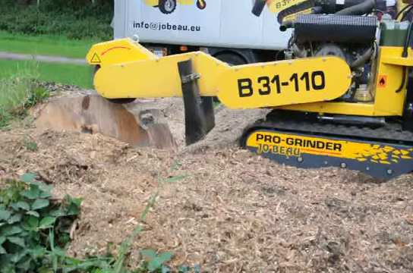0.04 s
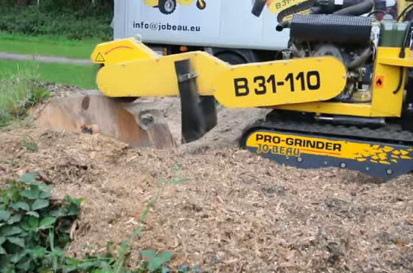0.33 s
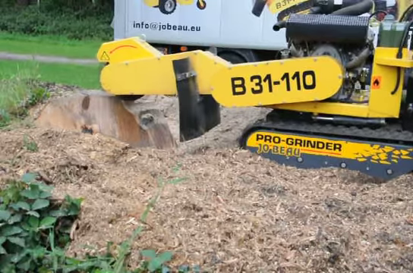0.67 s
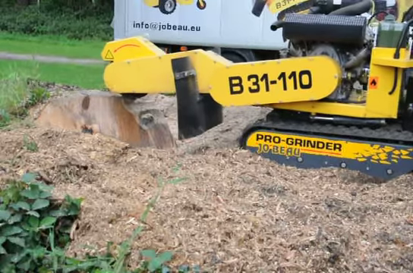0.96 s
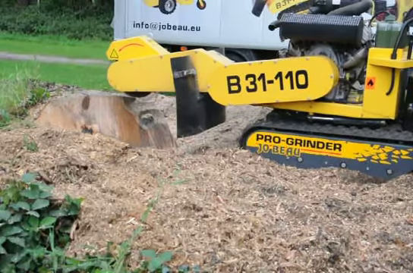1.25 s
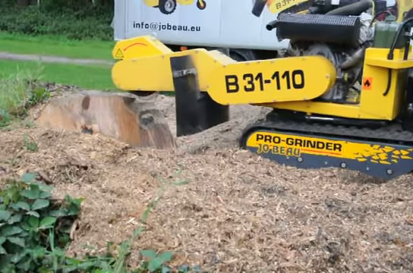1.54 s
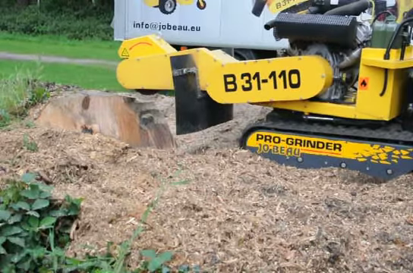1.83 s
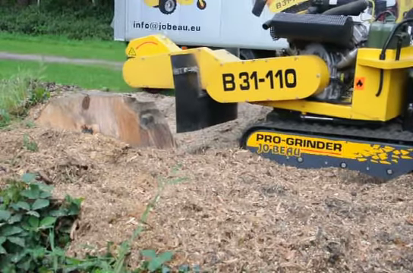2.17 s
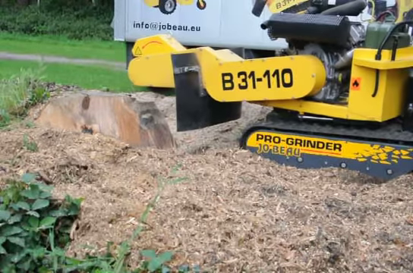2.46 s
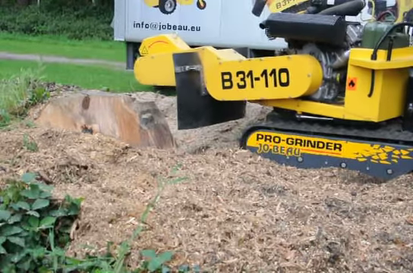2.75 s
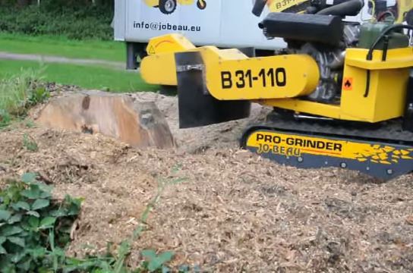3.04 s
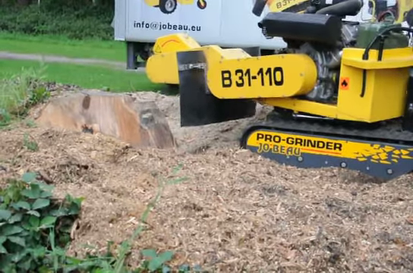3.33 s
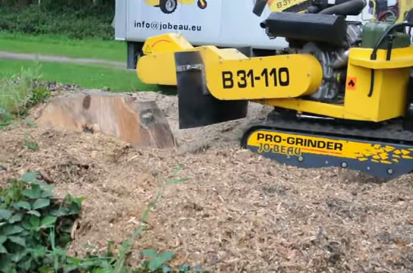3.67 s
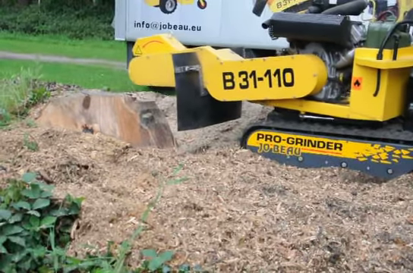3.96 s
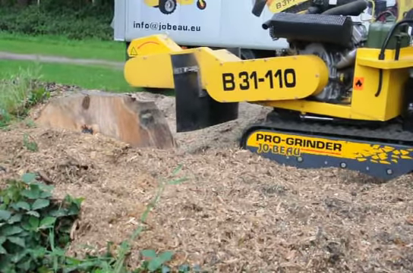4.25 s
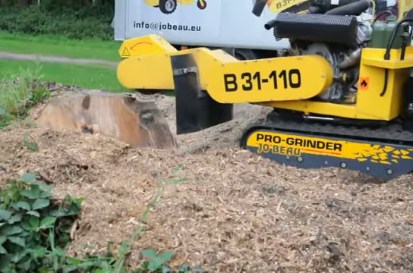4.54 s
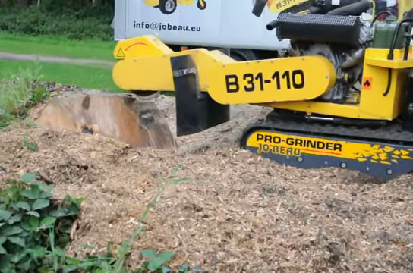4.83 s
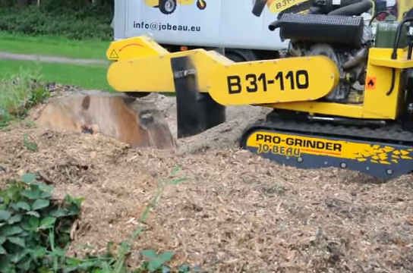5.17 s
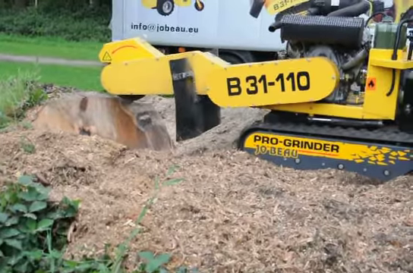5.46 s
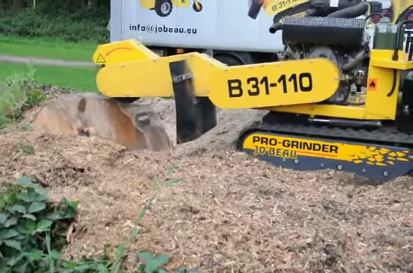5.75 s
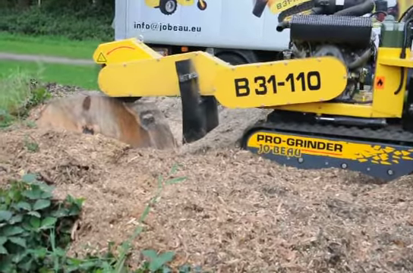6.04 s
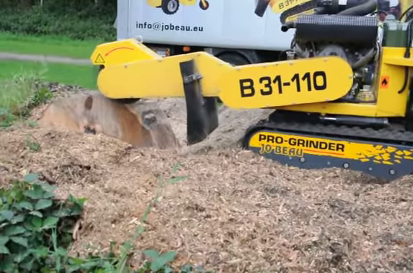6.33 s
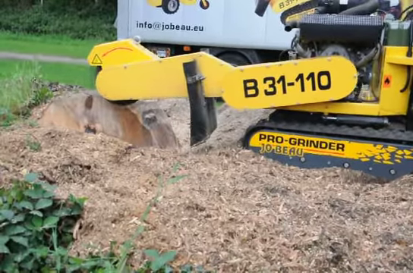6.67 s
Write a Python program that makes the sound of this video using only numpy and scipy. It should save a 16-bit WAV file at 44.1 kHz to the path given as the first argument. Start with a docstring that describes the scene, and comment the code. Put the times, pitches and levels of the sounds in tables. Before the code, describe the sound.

Outdoors, the loud drone of a stump grinder fades in and holds at full speed. Rapid muffled exhaust pulses mix with a clattering engine casing, whining drive parts and sharp metallic ticks. A gritty rush from the fan and cutter wheel swells a little and settles. One thin click interrupts briefly, then the valve rattle grows stronger toward the finish.

```python
"""A stump grinder fades in outdoors, already at full throttle. Its V-twin fires in uneven pairs through
a muffler, the casing knocks, valves tick, shaft-driven parts whine, fan and cutter wheel add a gritty rush.
The rush lifts a little as the boom swings out over the stump, then eases as it swings back.
At about five seconds the sound skips once with a thin click; near the end a loose valve rattles harder."""
import sys
import numpy as np
from scipy import signal
from scipy.fft import rfft, irfft, next_fast_len
from scipy.io import wavfile
from scipy.ndimage import map_coordinates

SR = 44100
rng = np.random.default_rng(int(sys.argv[2]) if len(sys.argv) > 2 else 0)


def generate_wav(signal):
    """Clip the signal to [-1, 1] and save it as 16-bit WAV at the path in sys.argv[1]."""
    frames = np.transpose(np.atleast_2d(signal))
    scaled = np.clip(frames, -1, 1) * 32767
    pcm = np.round(scaled).astype(np.int16)
    wavfile.write(sys.argv[1], SR, pcm)


N = 295470
SKIP_S = 5.075

# the two cylinders firing: place/cycle, level/dB
CYLINDER_BEATS = [(.595, 0), (.97, -.5)]
# valve strokes, the loose valve much the louder: place/cycle, level/dB
VALVE_BEATS = [(.42, 0), (.04, -9)]


def amp(db):
    return 10 ** (np.asarray(db) / 20)


def unit(x):
    """Normalise to an RMS of one."""
    return x / np.sqrt(np.mean(x ** 2) + 1e-20)


def eq_gain(points, hz):
    """Gain of an EQ curve drawn through (f/Hz, level/dB) points on a log frequency axis."""
    f, db = np.transpose(points)
    return amp(np.interp(np.log(hz + 1), np.log(f + 1), db))


def automation(points):
    """One value per sample, ramping between (t/s, value) points."""
    return np.interp(np.arange(N) / SR, *np.transpose(points))


def wobble(rate):
    """A smooth random curve, rate knots a second."""
    coarse = np.arange(0, N + 64, 64)
    knots = rng.standard_normal(int(N * rate / SR) + 4)
    return np.interp(np.arange(N), coarse, map_coordinates(knots, [coarse * rate / SR]))


def filtered(x, response):
    """Filter x by a complex response, given as a function of frequency."""
    size = next_fast_len(N + SR // 2)
    return irfft(rfft(x, size) * response(np.fft.rfftfreq(size, 1 / SR)), size)[:N]


def ring_through(x, points, size=16384):
    """Minimum-phase EQ: the ring follows each hit."""
    cepstrum = irfft(np.log(eq_gain(points, np.fft.rfftfreq(size, 1 / SR))))
    cepstrum[1:size // 2] *= 2
    cepstrum[size // 2 + 1:] = 0
    impulse_response = irfft(np.exp(rfft(cepstrum)))
    return signal.fftconvolve(x, impulse_response)[:N]


def strokes(cycle, place, scatter_db, jitter_s):
    """One impulse per engine cycle at the given place, uneven in strength and timing."""
    at = np.flatnonzero(np.diff(np.floor(cycle - place)) > 0)
    chance = rng.standard_normal((len(at), 2))
    at = np.clip(at + jitter_s * SR * chance[:, 0], 0, N).astype(int)
    return np.bincount(at, amp(scatter_db * chance[:, 1]), N + 1)[:N]


def surge(cycle, beats, lag, decay):
    """A sharp-attack envelope for each beat; lag and decay are in cycles."""
    return unit(sum(amp(db) * np.exp(-((cycle - place - lag) % 1) / decay) for place, db in beats))


def crank():
    """Four-stroke cycles turned so far: the governor hunts gently, and the beat slips back at the skip."""
    cycle_hz, slip_cycles = 27.54, .353
    swing_hz, period_s, fastest_s = .074, 3.4, .28
    t = np.arange(N) / SR
    hunt = swing_hz * period_s / (2 * np.pi) * np.sin(2 * np.pi * (t - fastest_s) / period_s)
    return cycle_hz * t + hunt - slip_cycles * (t >= SKIP_S)


def rush(cycle):
    """A bed of fan air pulsing with the engine, with grit and chips flung by the cutter wheel."""
    # colour of the fan and cutter noise: f/Hz, level/dB
    rush_eq = [(30, -24), (110, -2), (220, 7.5), (360, 3.5), (600, 7.5), (830, 0), (1100, 5.5), (1400, -5),
               (1750, 6), (2050, -3), (3400, -0.5), (3750, -4), (4450, 1), (5400, -13.5)]
    chips_per_s = 700
    pulsing = 1 + .067 * surge(cycle, CYLINDER_BEATS, lag=-.25, decay=.28)
    air = rng.standard_normal(N) * pulsing * amp(.7 * wobble(25))
    grit = (rng.random(N) < chips_per_s / SR) * rng.standard_normal(N)
    return unit(filtered(unit(air) + amp(-8) * unit(grit), lambda hz: eq_gain(rush_eq, hz)))


def whine(cycle):
    """Shaft-locked tones that swell at random and flutter as the machine shakes."""
    # hum and whine of flywheel, belt drive and cutter wheel: multiple of the cycle rate, level/dB
    partials = [(4.83, -43), (7.47, -44), (11.92, -46), (16, -43), (17, -42), (18, -40), (19, -39),
                (22, -32.5), (24, -28.2), (25, -30.3), (26, -38), (27, -32), (32, -35.3), (34, -39),
                (36, -29.6), (40, -32.5), (44, -38), (46, -41), (48, -44), (57, -41), (62, -36.7),
                (64, -36.5), (66, -43), (80, -48)]
    shaft = cycle + .00092 * wobble(22)
    tones = np.zeros(N)
    for multiple, db in partials:
        drift = rng.random() + .025 * wobble(2.454)
        swell = unit(amp(1.1 * wobble(2.107) + 1.4 * wobble(14)))
        tones += amp(db) * swell * unit(np.sin(2 * np.pi * (multiple * shaft + drift)))
    return tones


def rockers(cycle):
    """The rockers rasp briefly with every valve stroke."""
    # bright colour of the rasp: f/Hz, level/dB
    rasp_eq = [(1500, -42), (2800, -11.5), (4000, -3.5), (4600, -5.5), (5000, 0), (5400, 1.5), (5700, -7.5)]
    envelope = surge(cycle, VALVE_BEATS, lag=0, decay=.15)
    bursts = rng.standard_normal(N) * envelope * amp(2.1 * wobble(40))
    return unit(filtered(bursts, lambda hz: eq_gain(rasp_eq, hz)))


def valves(cycle):
    """Each valve ticks once a cycle, never equally hard, and rings the cover with a varying colour."""
    # ring of the valve cover: f/Hz, level/dB, t60/s
    cover_modes = [(3010, -15, .02), (3430, 0, .045), (3510, -2.5, .04), (4150, -12, .03),
                   (4540, -5.5, .035), (5300, -14, .02), (5600, -8, .02)]
    # how hard the valves strike: t/s, level/dB
    rattle = [(0.6, -24.5), (1.4, -23.5), (2.6, -27.5), (3.8, -27), (4.3, -24.5), (4.8, -28), (5.5, -23),
              (6.6, -18)]
    # the hardest snaps of the loose valve: t/s, level/dB
    snaps = [(1.2065, -11.5), (1.4704, -15), (3.1023, -14.5), (4.41, -12.5), (5.837, -18.5), (6.5281, -15),
             (6.565, -10.5)]
    snap_trim_db, mode_scatter_db = -4, 3.1
    blows = sum(amp(db) * strokes(cycle, place, scatter_db=3, jitter_s=.0004)
                for place, db in VALVE_BEATS)
    blows *= amp(automation(rattle))
    for s, db in snaps:
        blows[round(s * SR)] += amp(db + snap_trim_db)
    t = np.arange(SR // 16) / SR
    modes = np.array([amp(db - 60 * t / t60) * np.sin(2 * np.pi * hz * t) for hz, db, t60 in cover_modes])
    noise_decay = .27 * amp(-60 * t / .02)
    attack = 1 - np.exp(-t / .0011)
    ticks = np.zeros(N + len(t))
    for at in np.flatnonzero(blows):
        ring = amp(mode_scatter_db * rng.standard_normal(len(modes))) @ modes
        crack = noise_decay * rng.standard_normal(len(t))
        ticks[at:at + len(t)] += blows[at] * attack * (ring + crack)
    return ticks[:N]


def exhaust(cycle):
    """Uneven pairs of puffs boom in the muffler; each cylinder burns a little differently every time."""
    # tone of an exhaust pulse after the muffler: f/Hz, level/dB
    muffler_eq = [(27, -36.5), (55, -12), (82, -13.5), (110, -16.5), (137, -5.5), (165, -7), (192, 1),
                  (220, -22), (247, -14.5), (275, -14.5), (330, -25.5), (480, -16), (800, -40.5),
                  (2500, -65.5)]
    puffs = sum(amp(db + .6 * wobble(4.3)) * strokes(cycle, place, scatter_db=1.22, jitter_s=.00022)
                for place, db in CYLINDER_BEATS)
    return unit(ring_through(puffs, muffler_eq))


def casing(cycle, knocks_per_cycle=14):
    """The engine's midrange body: shaft-timed knocks and combustion noise shake the same panels."""
    # casing and panel resonances: f/Hz, width/Hz, level/dB
    panel_modes = [(529, 160, -5), (659, 192, -2), (1023, 61, -2.5), (1134, 142, -5), (1574, 146, -7),
                   (1690, 180, -9.5), (2306, 200, -17), (2790, 270, -18)]

    def panels(f):
        resonance = sum((-1) ** k * amp(db) * 1j * f * width / (hz * hz - f * f + 1j * f * width)
                        for k, (hz, width, db) in enumerate(panel_modes))
        return resonance / (1 + (380 / (f + 1)) ** 4)  # small panels radiate little bass

    places = (np.arange(knocks_per_cycle) + rng.random(knocks_per_cycle)) / knocks_per_cycle
    knocks = sum(amp(4.2 * wobble(2)) * strokes(cycle, place, scatter_db=2.5, jitter_s=.00011)
                 for place in places)
    roar = rng.standard_normal(N) * (1 + .17 * surge(cycle, CYLINDER_BEATS, lag=-.31, decay=.06))
    return unit(filtered(unit(knocks) + amp(4) * unit(roar), panels))


def scene():
    """Mix all layers on one crank; with the boom out, the rush lifts and the engine sits back a touch."""
    # fader for exhaust and casing as the machine swings: t/s, level/dB
    engine_fader = [(0.7, -14), (1.05, -14), (1.5, -15.5), (2.0, -13.5), (2.4, -15.5), (3.0, -15),
                    (3.8, -15.5), (4.2, -13.5), (4.7, -15), (5.3, -14.5), (5.9, -13.5), (6.65, -15.5)]
    # the boom's sweep over the stump and back: t/s, position (0 near, 1 far)
    boom_sweep = [(.5, 0), (3.35, 1), (5.6, 0)]
    cycle = crank()
    engine_db = automation(engine_fader)
    boom_out = automation(boom_sweep)
    puffs = amp(engine_db - 8.5 - .7 * boom_out) * exhaust(cycle)
    body = amp(engine_db - 5.5 - .4 * boom_out) * casing(cycle)
    air = amp(-23 + 1.3 * boom_out) * rush(cycle)
    valve_train = valves(cycle) + amp(-35.5) * rockers(cycle)
    return (air + whine(cycle) + valve_train + puffs + body)[None]


def record(dry):
    """Fade in and cut the top end steeply; only the thin click of the skip reaches higher."""
    # opening fade: t/s, level/dB
    fade_in = [(0, -90), (.16, -80), (.17, -31), (.3, -23.5), (.45, -13.5), (.6, -4), (.7, -1.5)]
    high_cut_hz, click_decay_s = 5600, .00006
    faded = dry[0] * amp(automation(fade_in))
    dull = filtered(faded, lambda hz: (hz < 6300) / np.sqrt(1 + (hz / high_cut_hz) ** 56))
    since_skip = (np.arange(N) - round(SKIP_S * SR)) / SR
    click = amp(-13) * (since_skip >= 0) * np.exp(-abs(since_skip) / click_decay_s)
    return filtered(dull + click, lambda hz: hz < 16000)[None]


dry = scene()
out = record(dry)
generate_wav(out)
```